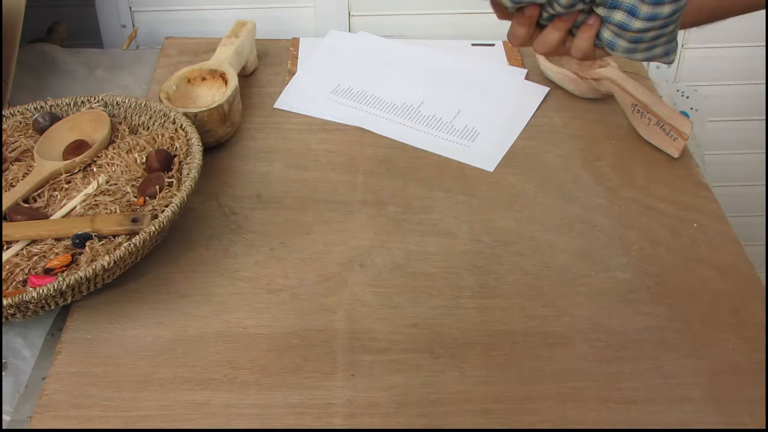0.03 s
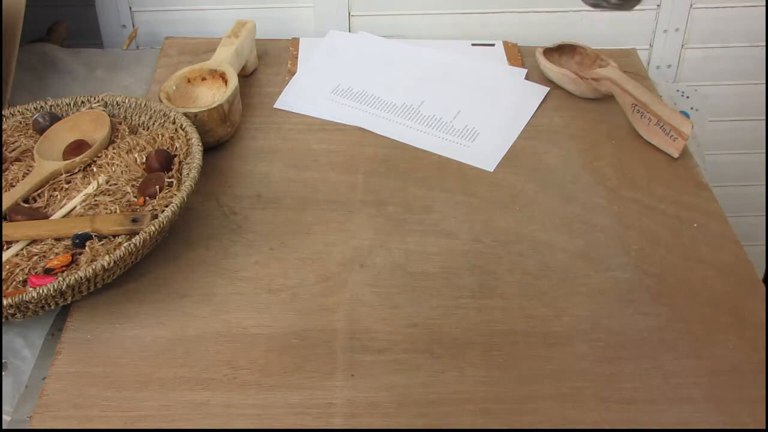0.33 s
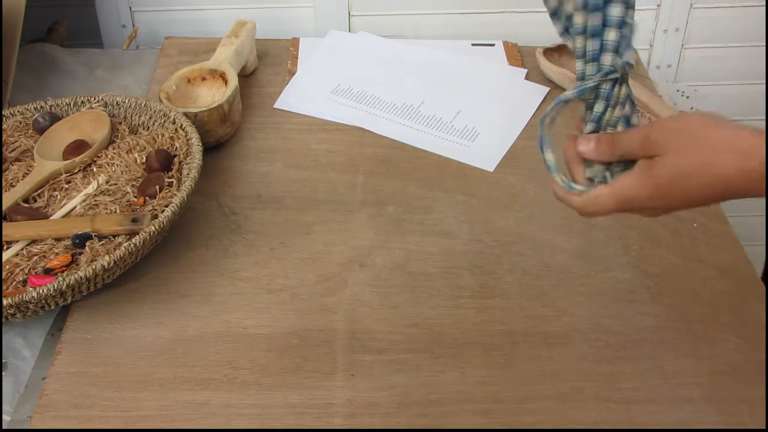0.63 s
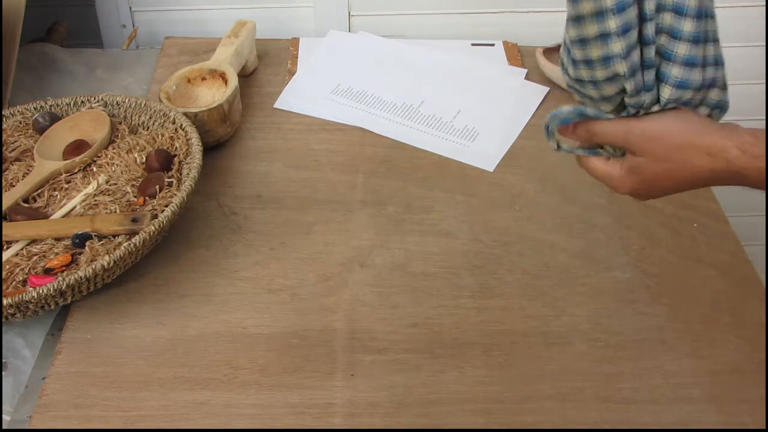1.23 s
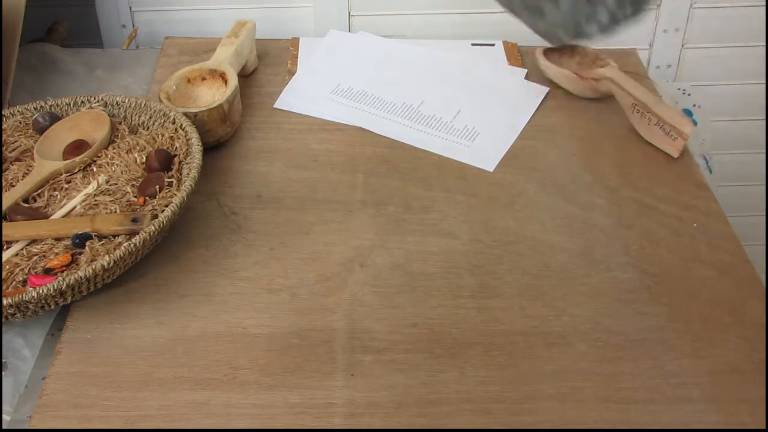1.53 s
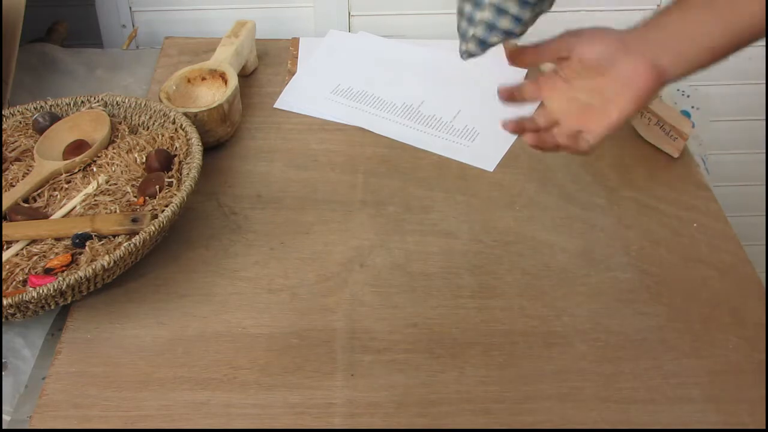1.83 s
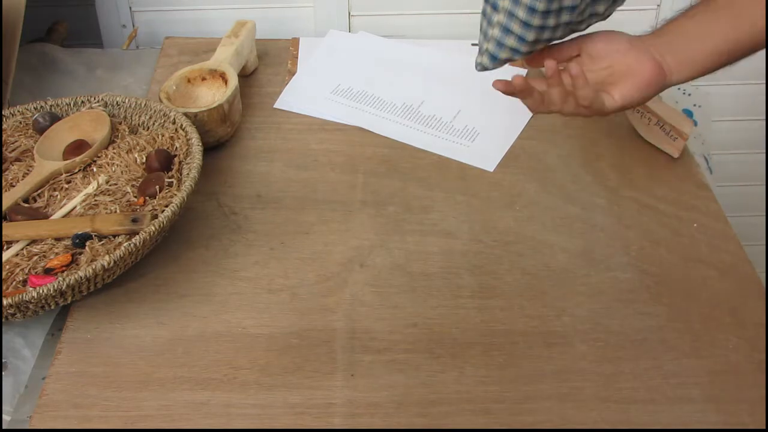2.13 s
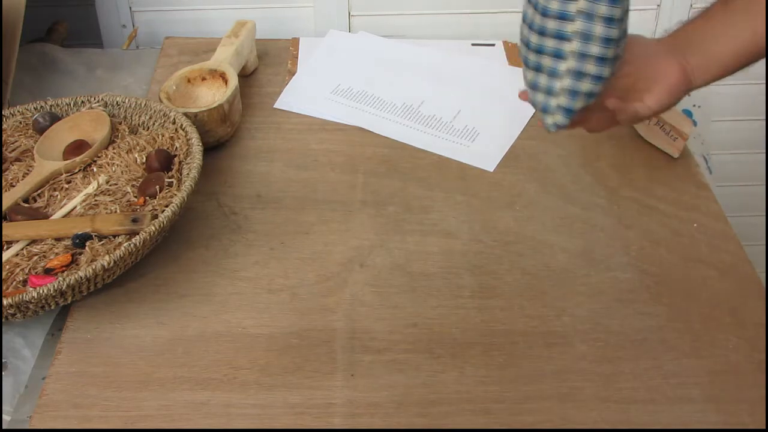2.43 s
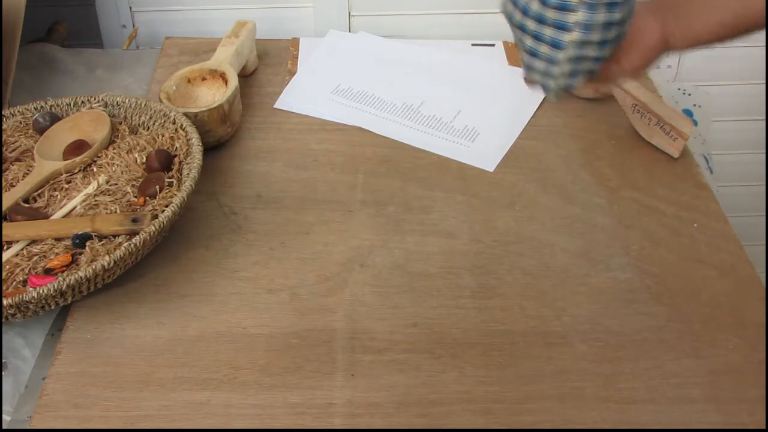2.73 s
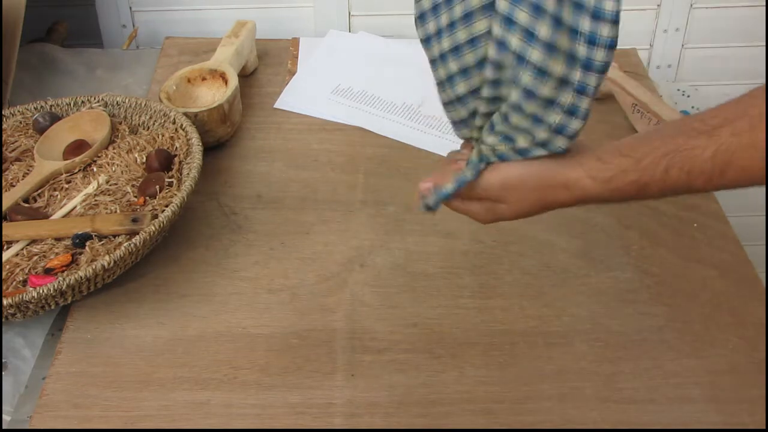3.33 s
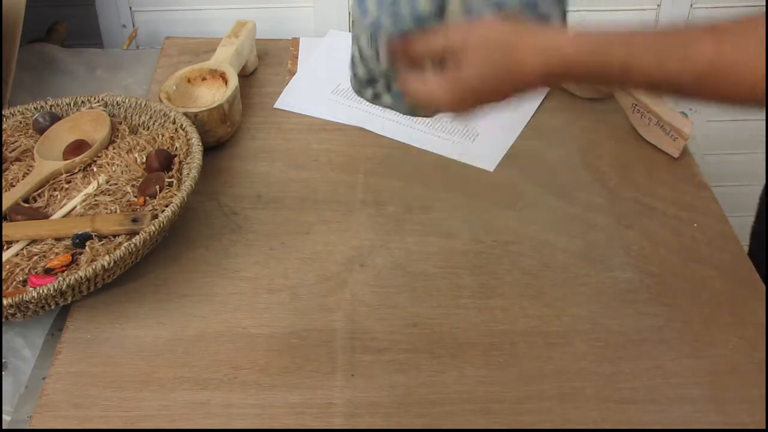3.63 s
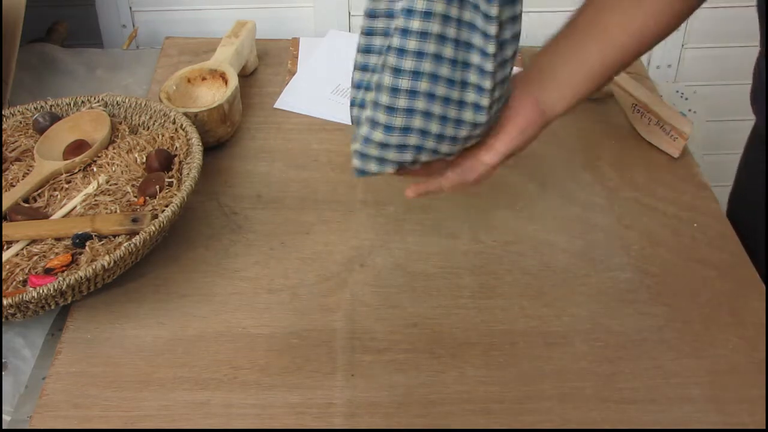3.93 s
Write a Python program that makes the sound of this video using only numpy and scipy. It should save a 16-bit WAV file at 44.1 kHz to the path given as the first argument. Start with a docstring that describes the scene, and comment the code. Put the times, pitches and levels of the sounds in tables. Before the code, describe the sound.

Small hard pieces click lightly inside a cloth bag, then tumble in a bright rush at about 0.8 seconds. Scattered clicks build to a louder rush near 1.8 seconds, followed by a lull with stray clicks. Rattling returns around 2.8 and 3.3 seconds and surges again just before 4. The cloth rubs faintly, slightly to the right, and a low room hum dips after the loud rushes.

```python
"""Small hard pieces click in clumps and pour in rushes as their cloth bag is lifted, tipped and caught.
Each impact radiates a brief pulse and rings a piece faintly; stragglers drop in the pauses.
The cloth rubs and its threads snap, over a table in a small reverberant room.
Automatic gain control turns the loud rushes down, so the room's hum sinks and slowly swells back."""
import sys
import numpy as np
from scipy import signal
from scipy.fft import rfft, irfft
from scipy.io import wavfile
from scipy.ndimage import uniform_filter1d

SR = 44100
rng = np.random.default_rng(int(sys.argv[2]) if len(sys.argv) > 2 else 0)


def dump(signal):
    """Clip the signal to [-1, 1] and save it as 16-bit WAV at the path in sys.argv[1]."""
    limited = np.clip(np.atleast_2d(signal).T, -1, 1)
    pcm = np.round(limited * 32767).astype(np.int16)
    wavfile.write(sys.argv[1], SR, pcm)


N = 176400

# Tumbling of the contents. Each row: time in seconds, relative level in dB.
TUMBLE_LEVEL = [(0, -20.5), (0.09, -24), (0.14, -34.5), (0.2, -40.5), (0.27, -29.5), (0.35, -28.5),
                (0.382, -25), (0.4, -19.5), (0.47, -21), (0.5, -25), (0.555, -20.5), (0.62, -24.5),
                (0.67, -23.5), (0.7, -19.5), (0.755, -19), (0.81, -7), (0.95, -8.5), (1.08, -24.5),
                (1.15, -40.5), (1.25, -36.5), (1.35, -44.5), (1.44, -21.5), (1.49, -26.5), (1.55, -17.5),
                (1.62, -23), (1.69, -19), (1.735, -20), (1.779, -23.5), (1.79, -10.5), (1.872, -2),
                (1.893, -9), (1.909, -4), (2.14, -37.5), (2.34, -45.5), (2.56, -42.5), (2.7, -35.5),
                (2.775, -20), (2.784, -14.5), (2.83, -19.5), (2.862, -16), (2.92, -30), (3.048, -24.5),
                (3.066, -19), (3.265, -14), (3.312, -7.5), (3.43, -15), (3.545, -13.5), (3.62, -23),
                (3.7, -20.5), (3.79, -23.5), (3.845, -17), (3.885, -5.5), (3.92, -11), (3.955, -1.5),
                (4, 4)]
# Clicks heard through the cloth. Each row: frequency in Hz, relative spectral level in dB.
CLICK_SPECTRUM = [(100, -48.5), (400, -33.5), (800, -17.5), (1300, -8.5), (1900, -2), (2700, -1), (4000, 2),
                  (5200, -0.5), (7000, -7.5), (9000, -10), (10200, -6), (12000, -14.5), (15500, -27)]
# Treble of the rattle. Each row: time in seconds, gain in dB before vigour brightens it.
TREBLE_GAIN = [(0, -3), (.13, 6), (.2, -2), (.27, 0.5), (.56, 2), (1.25, 5), (1.36, -1.5), (1.66, 6.5),
               (1.85, 2.5), (1.91, 4.5), (2.15, 1), (2.77, -1), (3.08, 8.5), (3.32, 3.5), (3.62, 4.5),
               (3.83, 9), (3.88, -0.5), (3.93, 4.5), (4, -2.5)]
# Lows and low mids of the rattle. Each row: time in seconds, gain in dB.
LOW_GAIN = [(0, -1.5), (1.73, 2), (1.8, -11.5), (1.87, 1.5), (2.8, -1), (3.87, 1)]
def tumbling_pieces(clumps_per_s=150, clump_s=0.0026, clump_db=2.5, hits_per_s=2100, brightening=0.27):
    """Clustered random impacts: one piece knocks its neighbours; a harder pour is denser and brighter."""
    level = curve(TUMBLE_LEVEL)
    vigour_db = level + 21  # scales both base rates
    overlap = amp(.5 * vigour_db)  # in a thick pour the clumps are many and merge
    starts = (rng.random(N) < overlap * clumps_per_s / SR) * rng.exponential(1, N) / overlap
    agitation = signal.lfilter([1], [1, -np.exp(-1 / (clump_s * SR))], starts)
    clumps = np.sqrt(1 + amp(clump_db) ** 2 * agitation)
    rate = hits_per_s * amp(.75 * vigour_db) * clumps
    hits = (rng.random(N) < rate / SR) * clumps
    hits *= amp(0.2 * np.minimum(rng.exponential(1, N), 3))  # slight spread of strength
    hits *= amp(level - 2) / np.sqrt(abs(uniform_filter1d(hits ** 2, size=1000)) + 0.003)
    clicks = colour(contact_noise(hits) + from_right(ringing(hits)), CLICK_SPECTRUM)
    treble = signal.sosfiltfilt(signal.butter(2, 6000, "high", fs=SR, output="sos"), clicks)
    low = signal.sosfiltfilt(signal.butter(2, 2400, fs=SR, output="sos"), clicks)
    treble_gain = amp(curve(TREBLE_GAIN) + brightening * vigour_db)
    return clicks + treble * (treble_gain - 1) + low * (amp(curve(LOW_GAIN)) - 1)


def contact_noise(hits, contact_s=0.00012, scatter_db=-8.5):
    """Impact radiation: each hit is a noise burst as short as the contact; the folds scatter part of it."""
    decay = np.exp(-2 / (contact_s * SR))
    bursts = np.sqrt(signal.lfilter([1 - decay], [1, -decay], hits ** 2 + 1e-20))
    direct = from_right(bursts * rng.choice([-1, 1], N))
    return direct + amp(scatter_db) * bursts * rng.standard_normal((2, N))


def ringing(hits, pieces=40, ring_s=0.0036, range_hz=(5890, 10740), gain_db=-33):
    """Damped free vibration: each hit rings one piece faintly at its natural frequency."""
    struck = rng.integers(0, pieces, N)
    decay = np.exp(-1 / (ring_s * SR))
    phase_steps = 2 * np.pi * rng.uniform(*range_hz, pieces) / SR
    return amp(gain_db) * sum(
        signal.lfilter([np.sin(w)], [1, -2 * decay * np.cos(w), decay ** 2], hits * (struck == k) + 1e-20)
        for k, w in enumerate(phase_steps))


# Single pieces falling hard. Each row: start in seconds, relative strength in dB.
KNOCK_EVENTS = [(.0735, -10), (0.1072, 4.5), (.206, -8.5), (.309, -11), (.366, -15), (1.2955, -5),
                (1.368, -5), (1.414, -0.5), (1.7414, 9.5), (1.783, 4.5), (1.803, 10), (2.019, 0),
                (2.072, -6), (2.1212, 2.5), (2.1793, -0.5), (2.371, -18), (2.453, -15.5), (2.545, -9),
                (2.659, -7.5), (2.7039, 1), (2.778, 7), (2.854, 6), (2.867, 3), (2.8763, -2), (2.927, 2),
                (3.073, 3), (3.184, 0), (3.2395, 6), (3.382, 10), (3.496, 6.5), (3.802, 3), (3.8825, 7)]
# Timbre of a knock. Each row: frequency in Hz, relative spectral level in dB.
KNOCK_SPECTRUM = [(100, -24), (700, -17), (1700, -4), (4000, 10.5), (6500, -2), (10000, -5.5),
                  (15500, -34.5)]
# Threads and edges catching in the cloth. Each row: start in seconds, relative strength in dB.
SNAP_EVENTS = [(.275, -10.5), (.431, -6), (.4835, -2), (.903, 13.5), (1.295, -3.5), (2.277, -16),
               (2.517, -23), (2.926, -21), (3.229, 5), (3.741, -10), (3.827, -1.5)]
# Timbre of a snap. Each row: frequency in Hz, relative spectral level in dB.
SNAP_SPECTRUM = [(100, -52), (2000, -13), (6000, -3.5), (11500, -2), (15500, -8.5)]
def jolts(events, spectrum, chatter_db, chatter_s=0.0032, gain_db=-3):
    """Impulsive excitation: one knock or snap sets the neighbouring pieces chattering."""
    impulses, chatter = np.zeros((2, N))
    t = np.arange(1024) / SR
    for start, db in events:
        add(impulses, start, amp([db]))
        add(chatter, start, amp(db + chatter_db) * np.exp(-t / chatter_s))
    return amp(gain_db) * colour(from_right(impulses) + contact_noise(chatter), spectrum)


# Timbre of the rubbing. Each row: frequency in Hz, relative spectral level in dB.
RUB_SPECTRUM = [(40, -18.5), (100, 6), (300, 0), (600, 4), (1200, 5), (2500, 1.5), (6000, -23.5),
                (15000, -29)]
# Strength of the rubbing. Each row: time in seconds, level in dB.
RUB_LEVEL = [(0, -41), (.4, -40), (.8, -49), (1.15, -43.5), (1.55, -37.5), (1.85, -45), (2.15, -39.5),
             (2.8, -40.5), (3.65, -55.5), (4, -32.5)]
def cloth_rub(rough_db=3):
    """Friction noise: fabric slides with uneven grip over the hand and the contents."""
    grip = amp(rough_db * slow_noise(300))
    friction = unit(grip * rng.standard_normal(N)) * amp(curve(RUB_LEVEL))
    return colour(from_right(friction), RUB_SPECTRUM)


# Decay of the room. Each row: frequency in Hz, time to fall 60 dB in seconds.
REVERB_TIMES = [(200, 0.57), (3000, 0.17), (14000, 0.05)]
# Reflections off table and wall. Each row: mean delay in seconds, gain in dB.
REFLECTIONS = [(.0036, -13.5), (0.012, -19.5)]
def room_response(tail_db=-6.5):
    """Reflection and absorption: near echoes and a short tail whose bass both channels share."""
    diffuse = diffuse_field(*rng.standard_normal((2, 12800)), apart_hz=1800)
    hz, t, spectra = signal.stft(diffuse, SR, nperseg=256)
    tail = signal.istft(spectra * amp(-60 * t / at_hz(REVERB_TIMES, hz)[:, None]), SR)[1]
    taps = amp(tail_db) * tail / np.linalg.norm(tail[0])
    for mean_delay, db in REFLECTIONS:
        delay = mean_delay * rng.uniform(.85, 1.15)
        for channel in taps:
            channel[round(delay * SR) + rng.integers(0, 6)] += amp(db)
    return taps


def reverberate(direct, places=41):
    """Time-varying reverberation: one response fades into the next as the bag is carried about."""
    place, out = np.linspace(0, places - 1, N), direct.copy()
    for k in range(places):
        near = np.flatnonzero(abs(place - k) < 1)
        fade = np.sqrt(1 - abs(place[near] - k))
        reflected = signal.fftconvolve(direct[:, near] * fade, room_response(), axes=1)
        for channel, sound in zip(out, reflected):
            add(channel, near[0] / SR, sound)
    return out


# Noise of the room air. Each row: frequency in Hz, relative spectral level in dB.
AIR_SPECTRUM = [(20, -14.5), (50, 4), (75, -4), (115, 9.5), (170, -5), (300, 6.5), (550, 3), (1200, 8),
                (2200, 2), (4500, -15), (8000, -52)]
def room_air(gain_db=-42, side_db=-6):
    """Ambient noise: a steady diffuse field, strongest in the lows and mids."""
    mid, side = colour(rng.standard_normal((2, N)), AIR_SPECTRUM)
    return amp(gain_db) * diffuse_field(mid, amp(side_db) * side, apart_hz=700)


# Partials of a machine's hum. Each row: frequency in Hz, level in dB.
HUM = [(36, -51), (100, -61.5), (199, -64.5)]
def machine_hum(waver=0.12):
    """Amplitude modulation: each low partial wavers slightly at random."""
    t, hum = np.arange(N) / SR, np.zeros(N)
    for hz, db in HUM:
        tone = np.sin(2 * np.pi * (hz * t + rng.random()))
        hum += amp(db) * unit(tone * (1 + waver * slow_noise(6000)))
    return hum


def from_right(x, lag_s=0.00004, pad=64):
    """Path difference: the bag is on the right, so its sound reaches the left channel later."""
    x = np.pad(x, (0, pad))
    hz = np.fft.rfftfreq(len(x), 1 / SR)
    left = irfft(rfft(x) * np.exp(-2j * np.pi * hz * lag_s), len(x))
    return np.array([left, x])[:, :-pad]


def diffuse_field(mid, side, apart_hz):
    """Spatial coherence: long waves reach both channels alike, short ones differ."""
    side = signal.sosfilt(signal.butter(1, apart_hz, "high", fs=SR, output="sos"), side)
    return np.array([mid + side, mid - side])


def colour(x, spectrum, size=4096):
    """Minimum-phase filtering with the given spectrum and a power gain of one."""
    log_gain = np.log(amp(at_hz(spectrum, abs(np.fft.fftfreq(size, 1 / SR)))))
    taps = np.fft.ifft(np.exp(np.conj(signal.hilbert(log_gain)))).real[:size // 2]
    return signal.oaconvolve(x, taps[None] / np.linalg.norm(taps), axes=1)[:, :N]


def amp(db):
    """Decibels to amplitude ratio."""
    return 10 ** (np.asarray(db) / 20)


def unit(x):
    """Normalisation to an rms of one."""
    return x / np.sqrt(np.mean(x ** 2) + 1e-20)


def slow_noise(samples):
    """A moving average of white noise, at unit rms."""
    return unit(uniform_filter1d(rng.standard_normal(N), size=samples))


def curve(table):
    """Linear interpolation of a time table at every sample."""
    return np.interp(np.arange(N) / SR, *np.transpose(table))


def at_hz(table, hz):
    """Interpolation on a log-frequency axis."""
    frequencies, values = np.transpose(table)
    return np.interp(np.log(hz + 1), np.log(frequencies), values)


def add(mix, start_s, sound):
    """Superposition of a sound from a given time."""
    part = mix[max(round(start_s * SR), 0):][:len(sound)]
    part += sound[:len(part)]


def scene(left_db=-1.38):
    """Superposition: the bag and its reflections, weaker on the left, over air and hum."""
    bag = tumbling_pieces()
    bag += jolts(KNOCK_EVENTS, KNOCK_SPECTRUM, chatter_db=-15)
    bag += jolts(SNAP_EVENTS, SNAP_SPECTRUM, chatter_db=-8.5)
    bag += cloth_rub()
    return reverberate(bag) * amp([[left_db], [0]]) + room_air() + machine_hum()


def record(dry, limit_db=-17, recover_db_per_s=12, sense_s=0.0074, edge_hz=15950):
    """Automatic gain control with a quick fall and slow recovery, then clipping and a band limit."""
    power = signal.lfilter([1 / (sense_s * SR)], [1, -np.exp(-1 / (sense_s * SR))], (dry ** 2).mean(0))
    recovery_db = np.arange(N) * recover_db_per_s / SR
    peak_db = np.maximum.accumulate(10 * np.log10(power + 1e-12) + recovery_db) - recovery_db
    cut_db = uniform_filter1d(np.maximum(peak_db - limit_db, 0), size=100)
    limited = np.clip(dry / amp(cut_db), -1, 1)
    lowpass = signal.firwin(511, edge_hz, window=("kaiser", 9), fs=SR)
    return signal.oaconvolve(limited, lowpass[None], "same")


dry = scene()
out = record(dry)
dump(out)
```